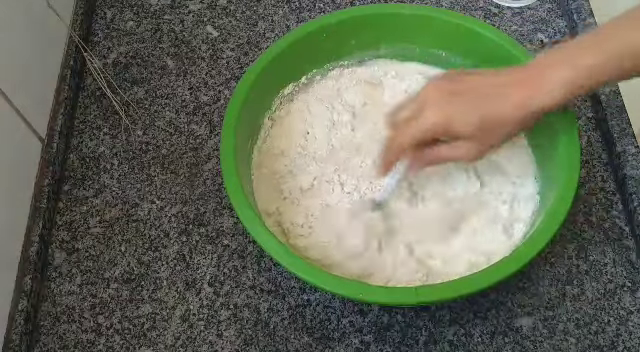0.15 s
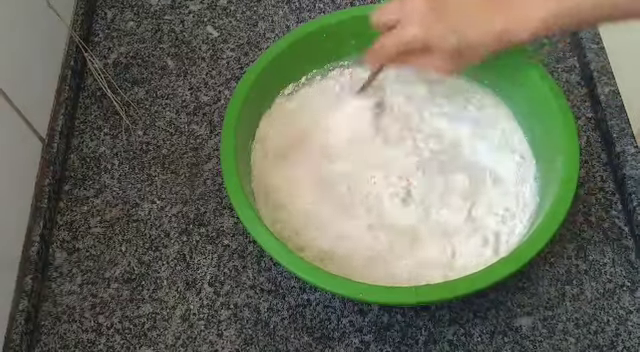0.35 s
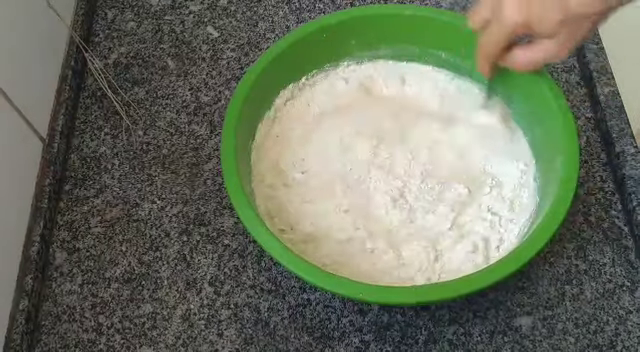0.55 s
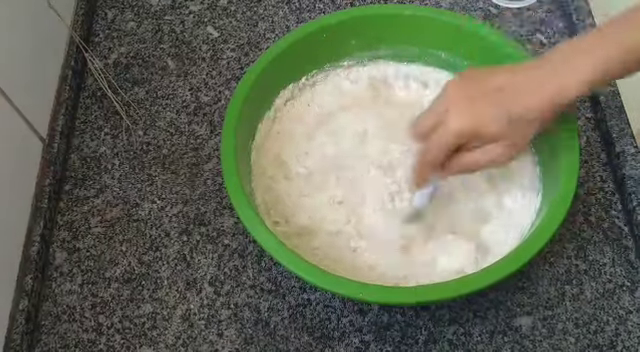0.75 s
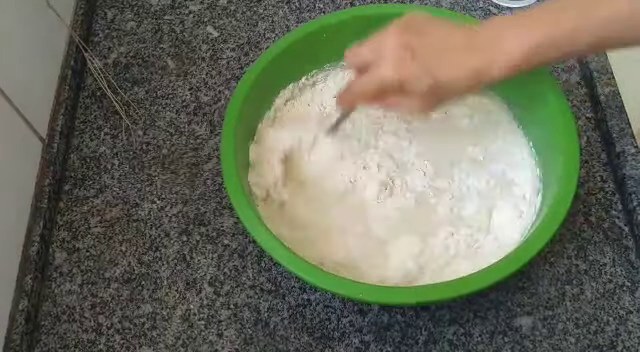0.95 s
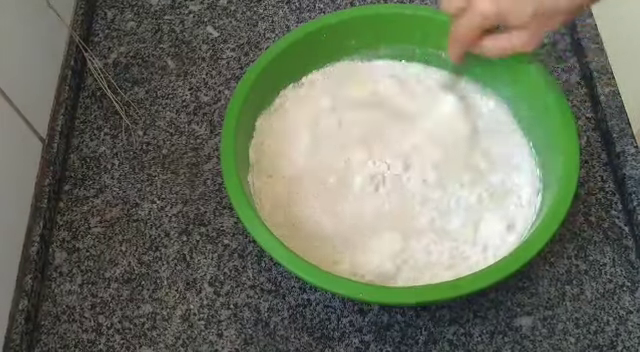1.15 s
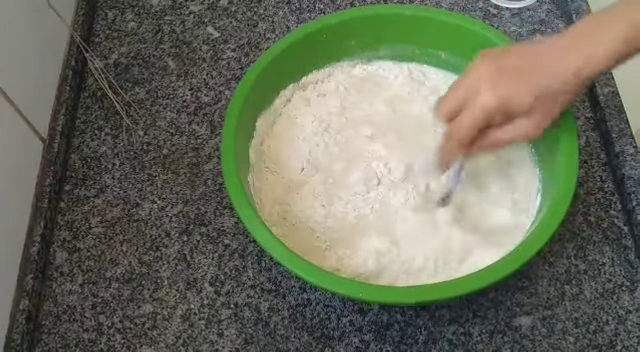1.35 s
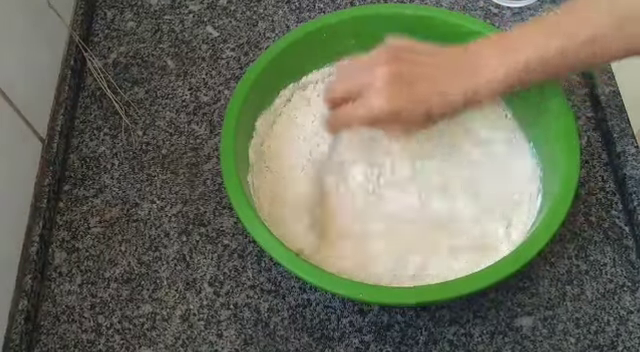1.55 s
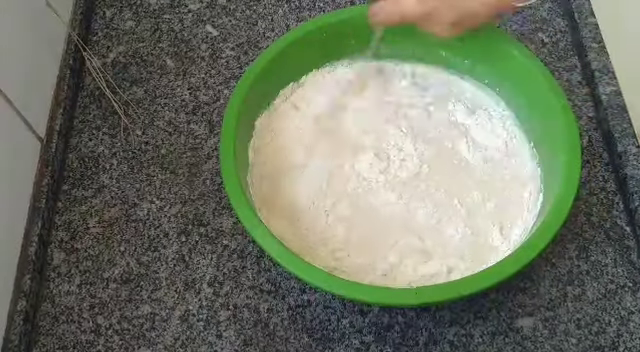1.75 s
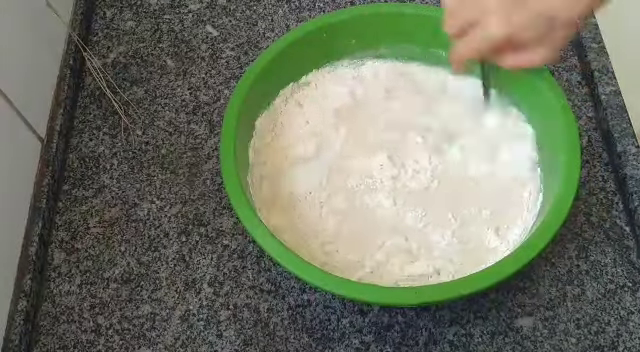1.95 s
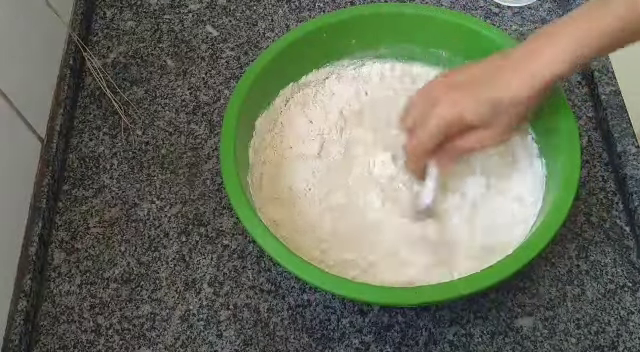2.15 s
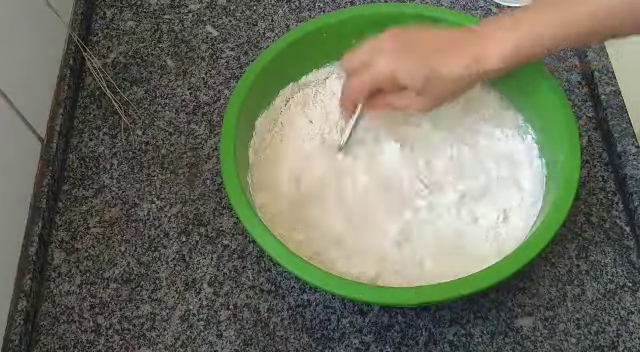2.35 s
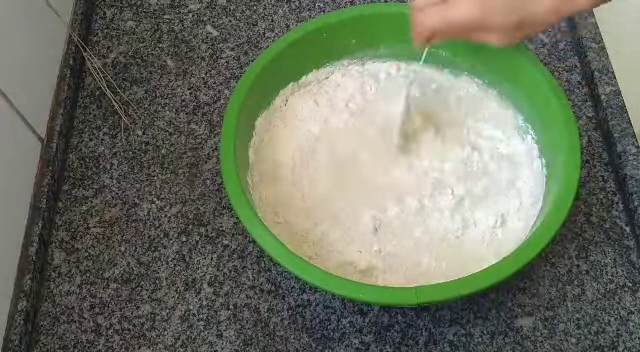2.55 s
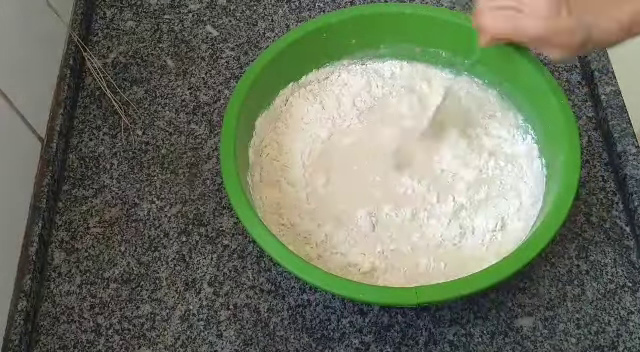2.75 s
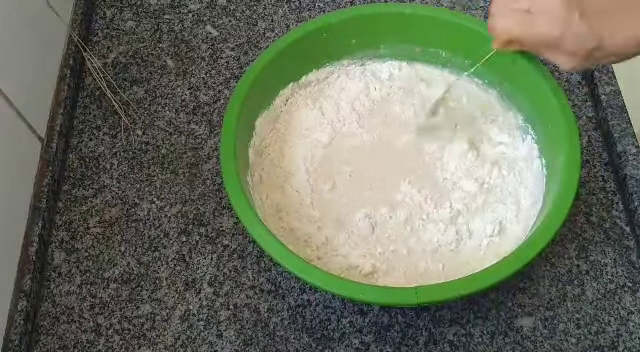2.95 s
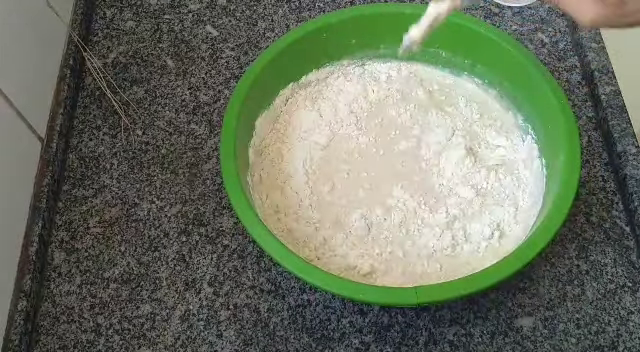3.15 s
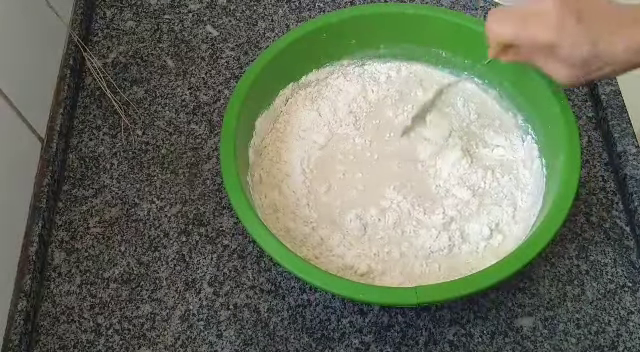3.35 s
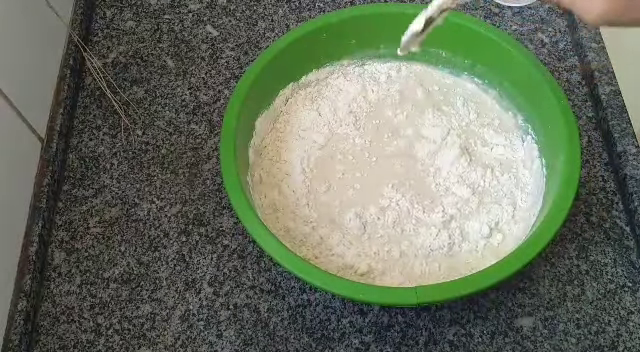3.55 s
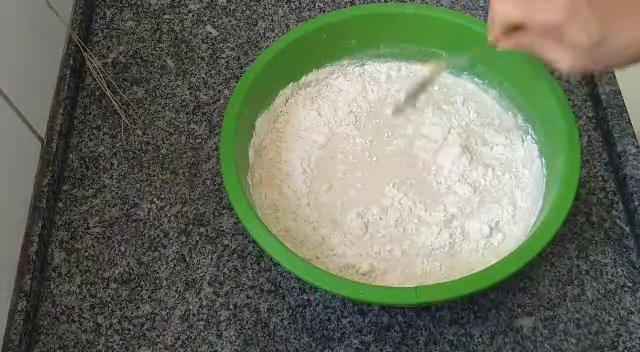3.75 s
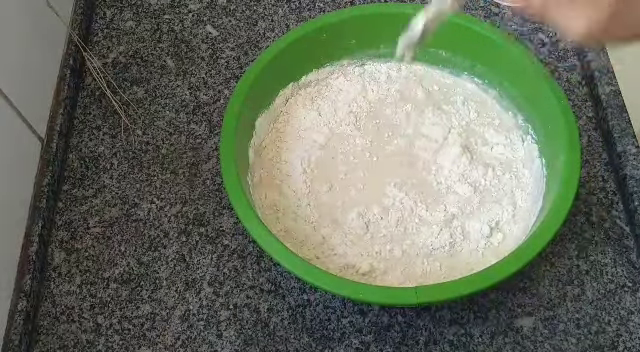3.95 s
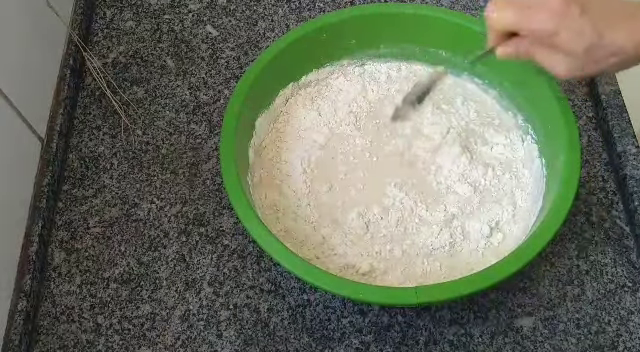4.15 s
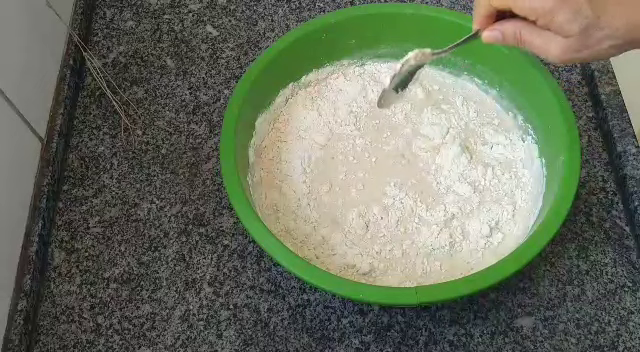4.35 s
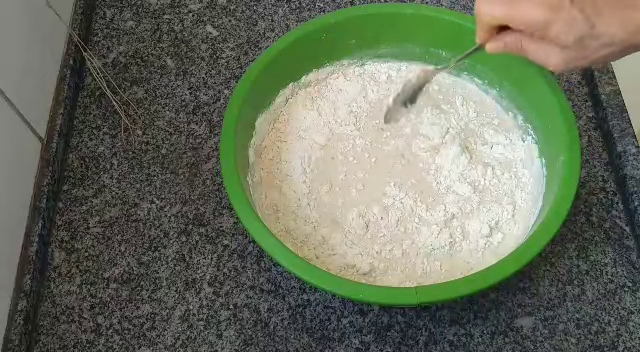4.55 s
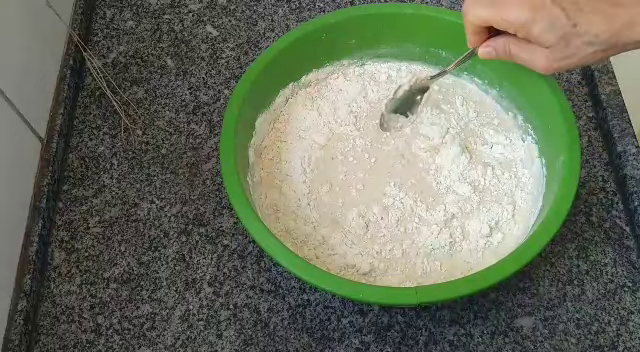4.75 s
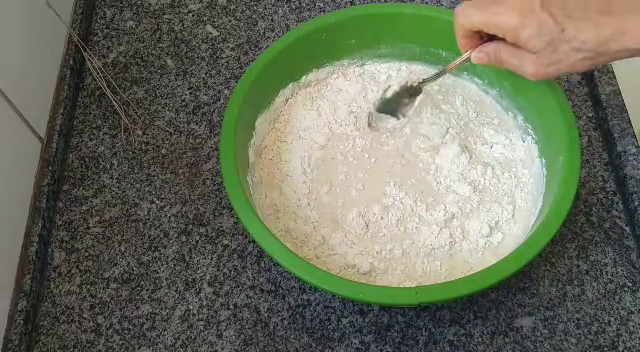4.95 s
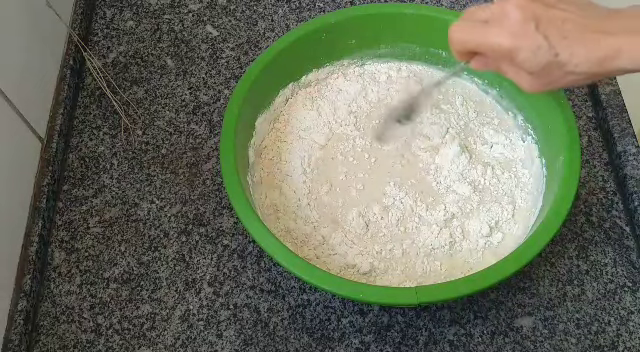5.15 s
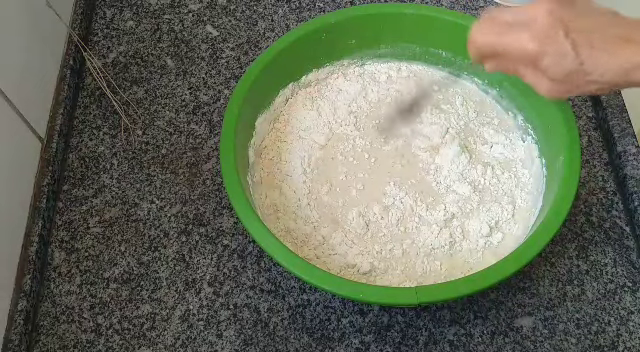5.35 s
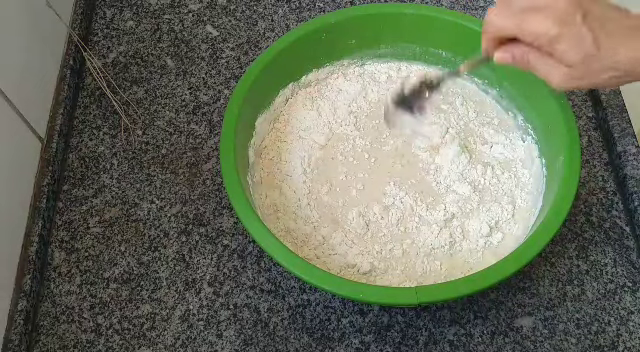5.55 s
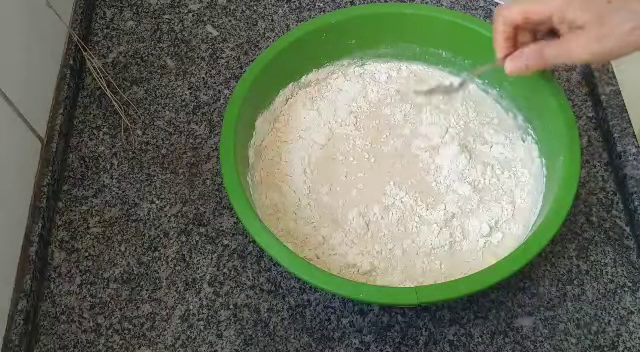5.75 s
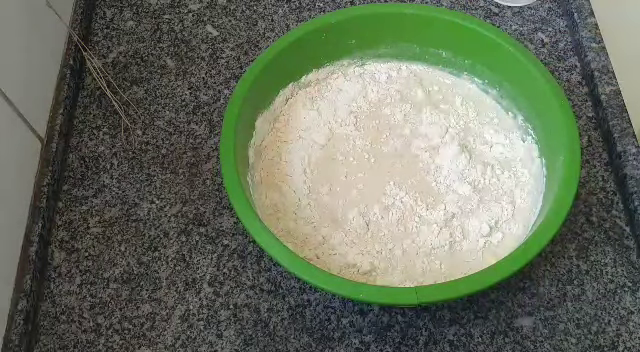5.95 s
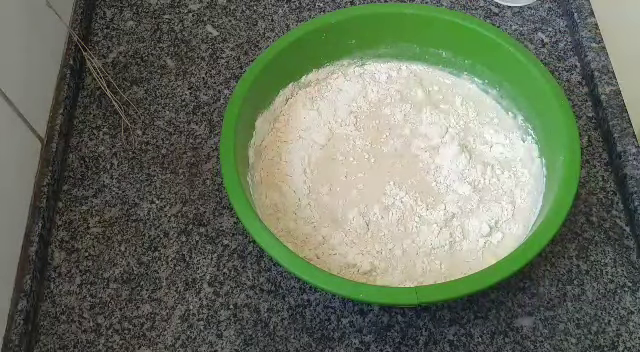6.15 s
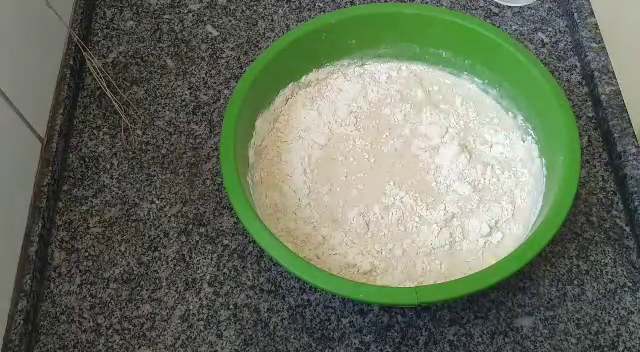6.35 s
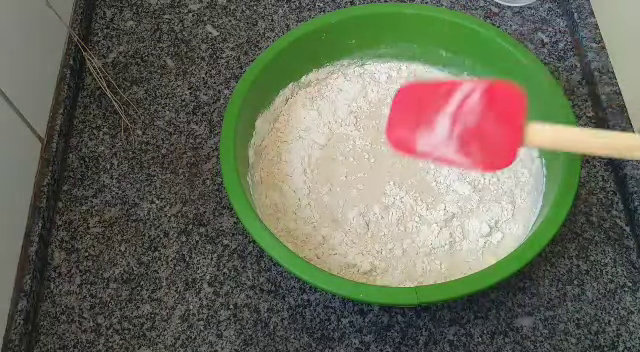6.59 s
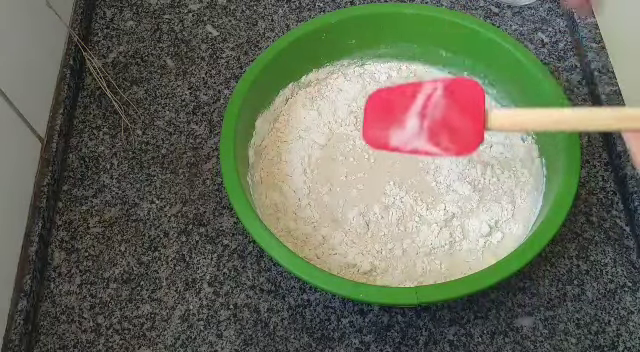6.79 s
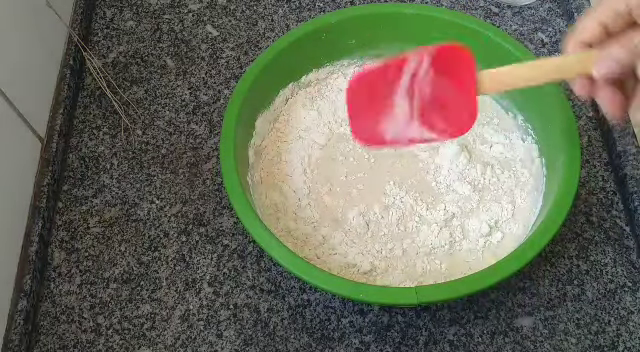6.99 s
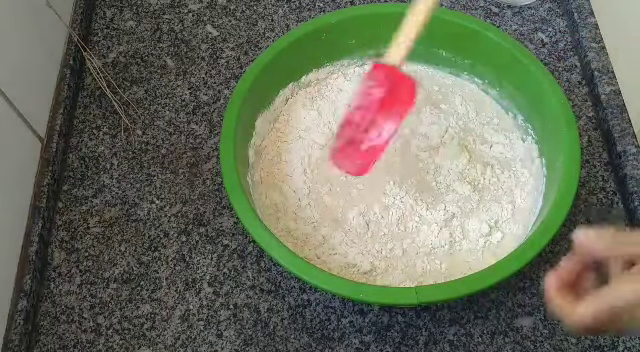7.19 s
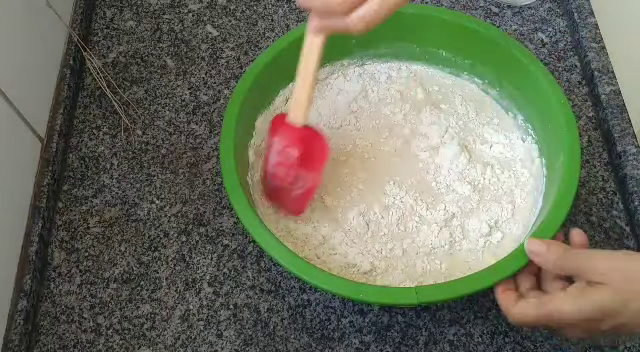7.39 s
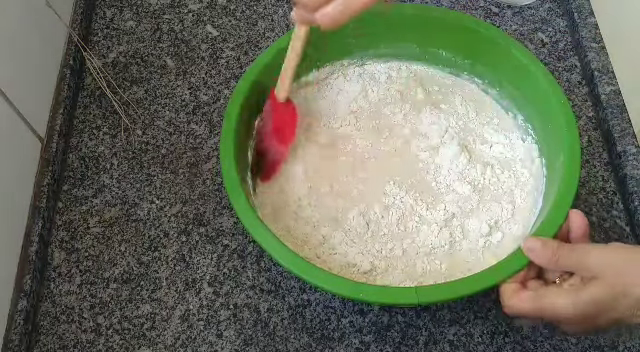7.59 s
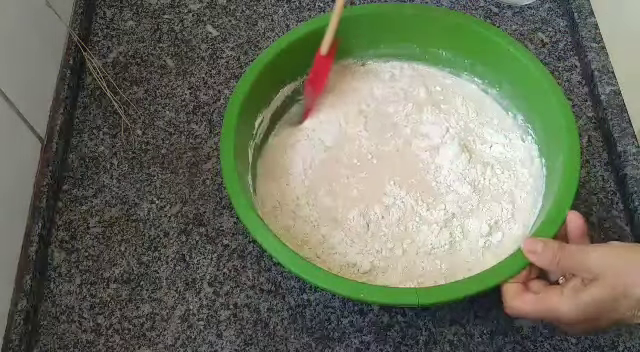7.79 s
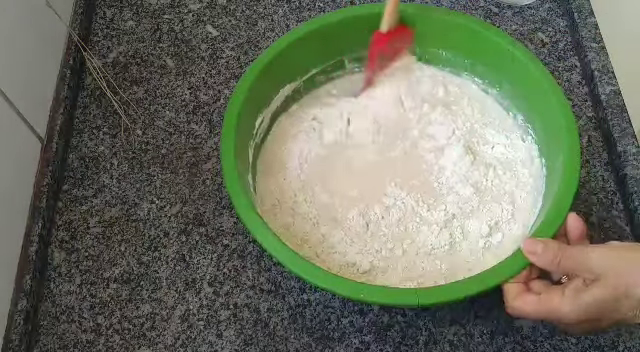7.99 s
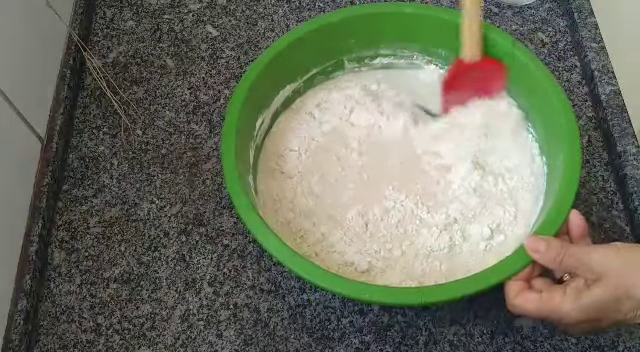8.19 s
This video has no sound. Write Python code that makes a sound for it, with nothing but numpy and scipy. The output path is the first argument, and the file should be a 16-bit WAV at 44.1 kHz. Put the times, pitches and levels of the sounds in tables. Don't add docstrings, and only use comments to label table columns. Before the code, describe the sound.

Close, wide phone sound of mixing: rapid stuttering spoon scrapes with knocks on a plastic bowl stop early, leaving soft hum, small spatters, two clear far wooden thuds and light sleeve rustle. Then a spoon lands ringing and bouncing in a steel sink. A hand settles on the bowl with a soft rumble, and a flexible spatula makes muted, dry wipes in a reflective kitchen.

```python
import sys
import numpy as np
from scipy import signal
from scipy.fft import rfft, irfft, next_fast_len
from scipy.io import wavfile
from scipy.ndimage import uniform_filter1d, minimum_filter1d, map_coordinates

SR = 44100
rng = np.random.default_rng(int(sys.argv[2]) if len(sys.argv) > 2 else 0)


def volts_from_db(level):
    exponent = np.asarray(level, float) / 20
    return 10 ** exponent


def waveform_to_disk(signal):
    frames = np.transpose(np.atleast_2d(signal))
    scaled = np.clip(frames, -1, 1) * 32767
    samples = np.round(scaled).astype(np.int16)
    wavfile.write(sys.argv[1], SR, samples)


N = 362885

# (time [s], length [s], pressure [dB], depth in bowl [dB], dryness [dB])
SPOON_STROKES = [(-0.02, .21, -35, -9.5, -8.5), (.397, 0.092, -40, -10, 4.5), (.545, 0.085, -48, 3.5, -22),
                 (.598, 0.26, -35.5, -12, -1), (1.043, 0.11, -39.5, -8, 9.5), (1.17, 0.13, -53, 4, 11),
                 (1.252, 0.2, -34.5, -11.5, -11.5), (1.641, 0.085, -43, -4, 2.5),
                 (1.77, 0.34, -55.5, 1, -11), (1.874, 0.048, -37.5, -3, 6), (1.948, 0.064, -42, -6, -8),
                 (2.055, 0.088, -34, -18, -4)]
# (time [s], length [s], pressure [dB], depth in bowl [dB], dryness [dB])
SPATULA_WIPES = [
    (7.558, 0.067, -61, -4.5, 12.5),
    (7.625, 0.14, -56, -25, 6),
    (7.769, 0.12, -49, -19, 1.5),
    (7.874, 0.12, -43.5, -5, -3.5),
    (7.974, 0.13, -47, -3, -2.5),
    (8.1, 0.043, -41.5, -3.5, -8),
    (8.17, 0.12, -51.5, -7, 0),
]
# (time [s], peak [dB])
CATCHES = [(0.053, -30), (0.116, -25), (0.142, -24), (0.454, -25.5), (0.469, -31.5), (0.554, -36),
           (0.569, -34), (0.623, -26), (0.639, -20), (0.682, -22), (0.716, -37), (0.731, -23.5),
           (0.751, -23.5), (0.794, -22.5), (0.808, -24), (0.825, -25), (0.849, -33), (1.085, -32),
           (1.098, -26.5), (1.141, -26.5), (1.183, -38), (1.266, -30), (1.295, -24), (1.338, -23),
           (1.364, -26), (1.392, -21), (1.444, -30), (1.652, -30), (1.69, -36), (1.883, -28), (1.908, -21),
           (1.959, -30), (2.057, -26), (2.074, -32), (2.109, -29), (2.138, -31), (7.59, -48), (7.606, -46),
           (7.649, -46), (7.699, -43), (7.815, -42), (7.835, -35), (7.893, -33), (7.913, -32), (7.921, -27),
           (7.955, -32), (8.022, -40), (8.053, -38), (8.104, -40), (8.119, -33), (8.132, -36),
           (8.217, -35.5)]
# (time [s], peak [dB], low push [dB], click [dB])
BUMPS = [(0.053, -40, -23, -22), (0.407, -24, -16, -14), (0.568, -27, 0, -28), (0.622, -9.5, -29, -29),
         (0.687, -11, -33, -37), (0.752, -43, -37, -26), (1.054, -31.5, -19, 4), (1.084, -19, -21, -17),
         (1.138, -18.5, -35, -17.5), (1.267, -24, -21, -19), (1.294, -16, -13, -25),
         (1.654, -23.5, -29, -10.5), (1.41, -34.5, 5.5, -17), (1.877, -21.5, 0.5, -9),
         (1.909, -18, -33, -24), (1.957, -15, -2.5, -13), (2.058, -13, -29, -18.5), (2.528, -34, -2, -9),
         (3.743, -34.5, -8, -8.5), (7.507, -36, -4.5, -12), (7.833, -23.5, -17, -9),
         (7.913, -20.5, -27, -13), (7.946, -24, -7, -3), (8.118, -33, -5, -10)]
# (frequency [Hz], width [Hz], level [dB])
BOTTOM_MODES = [(298, 86, -8.5), (439.3, 41, 0.5), (521, 49, -0.5), (668, 53, 2)]
# (frequency [Hz], width [Hz], level [dB])
WALL_MODES = [(785, 55, -5), (947, 74, -1), (1084, 53.4, 1.5), (1170, 263, -8.5), (1503, 181, -4.5),
              (2740, 220, -21)]
# (frequency [Hz], level [dB per Hz])
GRIT_SPECTRUM = [(900, -18), (2100, 6.5), (2700, 4.5), (3200, -0.5), (5000, -10), (8000, -21), (11000, -61),
                 (14000, -58)]
# (frequency [Hz], level [dB per Hz])
FLOUR_SPECTRUM = [(2500, -4), (6000, -1.5), (9000, -4), (12000, -7), (13600, -9.5), (14500, -42)]
# (frequency [Hz], gain [dB])
WET_DAMPING = [(6000, 1.5), (9000, 0), (11000, -3.5), (13500, -26.5)]
# (time [s], length [s], level [dB], crispness [dB])
RUSTLES = [
    (4.233, 0.15, -56, -20),
    (4.532, .14, -67.5, 4.5),
    (4.8, 0.81, -61, 0),
    (5.171, 0.29, -56, -3),
    (5.582, 0.26, -64, -5),
    (5.668, 0.32, -64, -4),
    (6.452, 0.26, -81, 17.5),
]
# (frequency [Hz], level [dB per Hz])
CLOTH_SPECTRUM = [(120, -12), (300, 1), (550, 1.5), (1000, -10), (2200, -13), (3500, -26)]
# (time [s], peak [dB], t60 [s])
SPLATS = [
    (2.8614, -52, 0.03),
    (2.8988, -37.5, 0.022),
    (3.389, -43, 0.031),
    (3.746, -49, 0.094),
    (4.122, -49, 0.028),
]
# (frequency [Hz], level [dB per Hz])
SPLAT_SPECTRUM = [(1500, -21), (4000, -2.5), (8000, 1), (12000, -1), (14000, -5), (14800, -40)]
# (time [s], peak [dB], sink [dB], handle modes [dB],
# crack [dB])
SINK_HITS = [
    (6.6886, -38, -4, -17, 9.5),
    (6.7208, -43, 6, -12, 9),
             (6.8037, -15.5, -7.5, -2.5, -3),
    (6.8248, -33.5, 2.5, 9, -16),
    (6.8453, -42.5, 18.5, 0, -6),
    (6.8717, -48, 3, 8, -8),
    (6.9103, -43, -19, -21, -13),
    (6.9354, -32, -3, -11, -12.5),
    (7.0394, -35, -0.5, -12, -8),
    (7.1048, -40.5, 0.5, -6.5, -5),
    (7.1598, -43.5, 2, -9, -10),
    (7.219, -51, 7.5, -2, -17),
]
# (frequency [Hz], level [dB], t60 [s], right lag [rad])
HANDLE_MODES = [(2557, -14, .15, .5), (3418, -23, .1, .5), (3811, -26, .1, 2.), (4242, -28, .1, 2.),
                (4521, -5, .3, 2.), (4503, -10, .55, 2.), (5093, -24, .2, 2.)]
# (frequency [Hz], level [dB], t60 [s], right lag [rad])
BLADE_MODES = [(5755, -26, .08, 3.1), (6896, -24, .2, 1.5), (8053, -11, .2, 2.), (8120, -12, .3, 2.16),
               (8530, -19, .07, 1.6), (9302, -25, .1, .4), (9615, -27, .15, .4), (10950, -21, .11, .4),
               (11075, -14, .19, 2.8), (11200, -15, .28, 2.), (12355, -17, .3, 1.6), (12670, -10, .16, 2.),
               (13180, -12, .2, 2.), (13340, -21, .25, 1.)]
# (frequency [Hz], level [dB], t60 [s], right lag [rad])
SCOOP_MODES = [(4823, -18, .1, 2.), (5110, -21, .2, 2.), (5520, -19, .25, 2.), (5970, -23, .3, 1.),
               (6500, -26, .2, 1.), (7278, -24, .26, 2.), (7900, -20, .2, 2.), (8400, -19, .25, 2.),
               (10150, -22, .3, 2.), (11630, -17, .25, 1.), (11880, -17, .25, 2.), (12480, -16, .2, 1.),
               (12900, -18, .2, 2.), (13100, -21, .25, 1.)]
# (frequency [Hz], level [dB], t60 [s], right lag [rad])
SINK_MODES = [(214, 0, .55, .1), (255, -9, .4, .2), (290, -13, .5, .3), (386, -8, .7, .4),
              (511, -4, .37, .5), (790, -10, .35, 1.), (834, -8, .4, 1.1), (972, 0, .5, 1.2),
              (1093, -8, .4, 1.), (1191, -12, .35, 1.), (1540, -12, .25, 1.), (1939, 3, .3, 2.3),
              (2686, -5, .18, .5), (2918, -13, .2, .5)]
# (frequency [Hz], level [dB per Hz])
SINK_SPECTRUM = [(230, -10), (450, -4.5), (1000, 0.5), (2700, -5.5), (3600, -16), (8000, -23), (9300, -32),
                 (13500, -27), (14500, -45)]
# (frequency [Hz], t60 [s])
SINK_T60 = [(200, 0.59), (1000, 0.2), (3000, 0.26), (10000, 0.56)]
# (time [s], length [s], rumble [dB])
GRIPS = [
    (7.469, 0.32, -63),
    (7.8, 0.23, -76),
    (7.95, .5, -76),
]
# (time [s], peak [dB], boom [dB])
THUDS = [
    (3.080, -31.5, -1),
    (3.409, -50.5, 12),
    (4.123, -21.5, -0.5),
]
# (frequency [Hz], t60 [s])
THUD_T60 = [(60, 0.57), (200, 0.71), (500, 0.57), (1100, 0.56), (3000, 0.051)]
# (frequency [Hz], level [dB per Hz])
BOOM_SPECTRUM = [(30, -7), (50, 7), (80, 6), (140, 11), (250, -5), (400, -31)]
# (frequency [Hz], level [dB per Hz])
KNOCK_SPECTRUM = [(250, -20.5), (400, -15.5), (700, -19.5), (1000, -14.5), (1400, -30), (2000, -35.5),
                  (4000, -50), (13000, -75)]
# (time [s], level [dB])
ROOM_TONE = [(0, -59), (2.4, -60), (4.1, -62), (4.4, -59), (5.4, -62), (5.9, -66.5), (6.6, -66),
             (6.9, -70.5), (7.2, -64), (7.7, -59.5), (8.23, -58.5)]
# (frequency [Hz], level [dB per Hz])
AIR_SPECTRUM = [(25, -15.5), (60, 3), (140, 0), (1000, -18.5), (4000, -26), (10000, -36.5), (12000, -35.5),
                (13500, -57)]
# (frequency [Hz], t60 [s])
KITCHEN_T60 = [(200, 0.55), (1000, 0.6), (4000, 0.52), (12000, 0.067)]
# (frequency [Hz], likeness [0-1])
ALIKE_NEAR = [(60, 1), (400, 0.79), (1000, 0.68), (1600, 0.15), (2500, 0.092)]
# (frequency [Hz], likeness [0-1])
ALIKE_AIR = [(25, 0.21), (100, 0.16), (1000, 0.1), (3000, 0.)]
# (frequency [Hz], share [0-1])
CROSS_FEED = [(100, 0.57), (2050, 0.56), (4100, 0.46), (6500, 0.29), (10000, 0.029), (14000, .05)]

BITE_S, ARCH_DB = 0.018, 5
CLIMB_DB = 0.5
LIFT_DB_PER_S, LOW_LINGERS, HISS_STOPS = 331, 0.34, 4.1
GRIT_DB, GRIT_DRY, GRIT_GROWS_DB = -15.5, 0.44, 3.5
WET_FLOUR_DB, DRY_FLOUR_DB = -28.5, -12.5
RUSTLE_GRIT_DB, RUSTLE_FLOUR_DB = -12, -11
CATCH_HZ, CATCH_SPREAD, CATCH_T60_S = 997, 0.1, 0.022
CATCH_DB, CATCH_RINGS_DB = -3, -2.5
HUM_HZ = 97.6
CROSS_DELAY_SAMPLES = 21
MASKED_DB = 15.5
HOP = 64


def unit(x):
    return x / np.sqrt(np.mean(x ** 2) + 1e-20)


def along(points, hz):
    f, v = np.transpose(points)
    return np.interp(np.log(hz + 1), np.log(f + 1), v)


def curves(rows):
    s, *cols = np.transpose(rows)
    return [np.interp(np.arange(N) / SR, s, c, left=-140, right=-140) for c in cols]


def wobble(rate_hz):
    knots = rng.standard_normal(int(N * rate_hz / SR) + 4)
    return map_coordinates(knots, [np.arange(N) * rate_hz / SR], order=2)


def filtered(x, response):
    m = next_fast_len(x.shape[-1] + 8192)
    return irfft(rfft(x, m) * response(np.fft.rfftfreq(m, 1 / SR)), m)[..., :x.shape[-1]]


def resonant(x, modes):
    def response(f):
        total = 0
        for k, (hz, width, db) in enumerate(modes):
            damping = 1j * f * width
            total = total + (-1) ** k * volts_from_db(db) * damping / (hz * hz - f * f + damping)
        return total
    return filtered(x, response)


def hiss(size, alike, spectrum=((1, 0),)):
    def response(hz):
        turn = np.arccos(np.clip(along(alike, hz), -1, 1)) / 2
        return volts_from_db(along(spectrum, hz)) * [np.cos(turn), np.sin(turn)]
    mid, side = filtered(rng.standard_normal((2, size)), response)
    return unit(np.array([mid + side, mid - side]))


def dying(x, t60s):
    hz, t, z = signal.stft(x, SR, nperseg=256)
    z = z * volts_from_db(-60 * t / along(t60s, hz)[:, None])
    return signal.istft(z, SR, nperseg=256)[1][:, :x.shape[1]]


def patchy(x, patchy_db):
    z = signal.stft(x, nperseg=256)[2]
    field = uniform_filter1d(rng.standard_normal(z.shape[1:]), size=4, axis=0)
    field = uniform_filter1d(field, size=10, axis=1)
    return unit(signal.istft(z * volts_from_db(patchy_db * unit(field)), nperseg=256)[1][:, :N])


def stroked(rows, fall, grows_db=0):
    s, length = np.transpose(rows)[:2, :, None]
    since = np.arange(0, N + HOP, HOP) / SR - s
    done = np.clip(since / length, 0, 1)
    arch_db = ARCH_DB * (np.sin(np.pi * done) - 1)
    bite_db = 20 * np.log10(np.clip(since / BITE_S, 1e-3, 1))
    hold_db = arch_db + grows_db * (done - 0.5) + bite_db
    lift_db = fall * LIFT_DB_PER_S * np.maximum(since - length, 0)
    return np.where(since < 0, -140, hold_db - lift_db)


def swells(rows):
    s, length = np.transpose(rows)[:2, :, None]
    done = np.clip((np.arange(0, N + HOP, HOP) / SR - s) / length, 0, 1)
    return np.sin(np.pi * done) ** 2


def summed(gains):
    total = np.sqrt(np.sum(gains ** 2, axis=0))
    return np.interp(np.arange(N) / HOP, np.arange(gains.shape[1]), total)


def add(out, s, x):
    part = out[:, round(s * SR):round(s * SR) + x.shape[1]]
    part += x[:, :part.shape[1]]


def scraping():
    rows = SPOON_STROKES + SPATULA_WIPES
    press_db, depth_db, dry_db = np.transpose(rows)[2:, :, None]
    load_db = np.array([WET_FLOUR_DB] * len(SPOON_STROKES) + [DRY_FLOUR_DB] * len(SPATULA_WIPES))[:, None]
    jolts_db = 1.0 * wobble(160) + 1.27 * wobble(40)

    wall = patchy(resonant(volts_from_db(jolts_db) * hiss(N, ALIKE_NEAR), WALL_MODES), patchy_db=1.5)
    bottom = unit(resonant(volts_from_db(1.2 * jolts_db) * hiss(N, ALIKE_NEAR), BOTTOM_MODES))
    wall_gain = summed(volts_from_db(press_db - 4 + stroked(rows, 1, CLIMB_DB)))
    bottom_gain = summed(volts_from_db(press_db + depth_db + stroked(rows, LOW_LINGERS, -CLIMB_DB)))
    bowl = wall_gain * wall + bottom_gain * bottom

    grit_db = 0.39 * jolts_db + 0.65 * wobble(300)
    grit = patchy(volts_from_db(grit_db) * hiss(N, ALIKE_NEAR, GRIT_SPECTRUM), patchy_db=3.0)
    flour_db = 1.8 * wobble(250) + 0.28 * jolts_db + 0.9 * wobble(22)
    flour = patchy(volts_from_db(flour_db) * hiss(N, ALIKE_NEAR, FLOUR_SPECTRUM), patchy_db=4.5)
    wet_flour = unit(filtered(flour, lambda hz: volts_from_db(along(WET_DAMPING, hz))))
    flour = np.where(np.arange(N) < 2.5 * SR, wet_flour, flour)
    hissing_db = press_db + stroked(rows, HISS_STOPS, GRIT_GROWS_DB)
    grit_gain = summed(volts_from_db(hissing_db + GRIT_DB + 4.0 + GRIT_DRY * dry_db))
    tool = grit_gain * grit + summed(volts_from_db(hissing_db + load_db + dry_db)) * flour

    cloth_db, crisp_db = np.transpose(RUSTLES)[2:, :, None]
    cloth = unit(volts_from_db(6.9 * wobble(30)) * hiss(N, ALIKE_AIR, CLOTH_SPECTRUM))
    rustle = summed(volts_from_db(cloth_db) * swells(RUSTLES)) * cloth
    crisp_gain = summed(volts_from_db(cloth_db + crisp_db) * swells(RUSTLES))
    crisp = crisp_gain * (volts_from_db(RUSTLE_GRIT_DB) * grit + volts_from_db(RUSTLE_FLOUR_DB) * flour)
    return bowl + tool + rustle + crisp


def catches():
    jerks, t = np.zeros((2, N)), np.arange(SR // 40) / SR
    draws = rng.standard_normal((len(CATCHES), 3))
    for (s, db), (spot, over, side) in zip(CATCHES, draws):
        phase = 2 * np.pi * CATCH_HZ * np.exp(CATCH_SPREAD * spot) * t
        envelope = volts_from_db(-60 * t / CATCH_T60_S) * (1 - np.exp(-t / 0.00078))
        swing = envelope * (np.sin(phase) + 0.38 * over * np.sin(1.485 * phase))
        add(jerks, s + 0.000984, volts_from_db(db + CATCH_DB + side * np.array([[0.7], [-0.7]])) * swing)
    return jerks + volts_from_db(CATCH_RINGS_DB) * resonant(jerks, WALL_MODES + BOTTOM_MODES)


def bumps():
    blows, out, t = np.zeros((2, N)), np.zeros((2, N)), np.arange(SR // 10) / SR
    push_spectrum = [(60, 2.0), (150, -5.5), (400, 7.0), (900, -31)]
    for s, db, low_db, click_db in BUMPS:
        add(blows, s, volts_from_db(db + 2.5 - 60 * t / 0.017) * hiss(len(t), ALIKE_NEAR))
        add(out, s, volts_from_db(db + low_db - 17.5 - 60 * t / 0.11) * hiss(len(t), ALIKE_NEAR, push_spectrum))
        add(out, s, volts_from_db(db + click_db - 18 - 60 * t / 0.093) * hiss(len(t), ALIKE_NEAR, GRIT_SPECTRUM))
    return out + resonant(blows, WALL_MODES)


def splats():
    out, t = np.zeros((2, N)), np.arange(SR // 8) / SR
    for s, db, t60 in SPLATS:
        envelope = volts_from_db(db - 7.0 - 60 * t / max(t60, 0.005)) * (1 - np.exp(-t / 0.0027))
        add(out, s, envelope * hiss(len(t), ALIKE_NEAR, SPLAT_SPECTRUM))
    return out


def ringing(modes, t, count, scatter_db, rattle_db):
    hz, db, t60, lag = np.transpose(modes)[:, :, None]
    slow = t[::21]
    draws = rng.standard_normal((count, len(hz), 61))
    flutter = signal.resample(draws[..., 1:], len(slow), axis=2)
    level = volts_from_db(db + scatter_db * draws[..., :1] + rattle_db * flutter - 60 * slow / t60)
    waves = np.sin(2 * np.pi * hz * t - np.array([0 * lag, lag]))
    return [np.einsum("mt,cmt->ct", np.repeat(hit, 21, axis=1), waves) for hit in level]


def spoon_in_sink():
    out, t, hits = np.zeros((2, N)), np.arange(SR * 11 // 20) / SR, SINK_HITS
    handles = ringing(HANDLE_MODES, t, len(hits), scatter_db=1.5, rattle_db=4.5)
    blades = ringing(BLADE_MODES, t, len(hits), scatter_db=1.5, rattle_db=5.5)
    scoops = ringing(SCOOP_MODES, t, len(hits), scatter_db=1.5, rattle_db=7.0)
    basins = ringing(SINK_MODES, t, len(hits), scatter_db=1.5, rattle_db=5.0)
    crack_spectrum = [(500, -20.0), (2600, -2.0), (6000, -17), (13000, -15.0), (15500, -30)]
    crack_snap = 1 + 1.03 * np.exp(-t / 0.00088)
    spoon_rise, sheet_rise = 1 - np.exp(-t / 0.00025), 1 - np.exp(-t / 0.0052)
    for hit, handle, blade, scoop, basin in zip(hits, handles, blades, scoops, basins):
        s, db, sink_db, handle_db, crack_db = hit
        spoon = volts_from_db(handle_db) * handle + volts_from_db(-2.5) * blade + volts_from_db(-10.0) * scoop
        crack = volts_from_db(crack_db - 60 * t / 0.059) * crack_snap * hiss(len(t), ALIKE_NEAR, crack_spectrum)
        sheet = volts_from_db(-16.5) * basin + volts_from_db(-6.5) * dying(hiss(len(t), ALIKE_NEAR, SINK_SPECTRUM), SINK_T60)
        add(out, s, volts_from_db(db - 7.5) * (spoon_rise * spoon + crack + volts_from_db(sink_db + 5) * sheet_rise * sheet))
    return out


def grip():
    rumble_db = np.transpose(GRIPS)[2][:, None]
    level = summed(volts_from_db(rumble_db + 4.0) * swells(GRIPS))
    out, start = np.zeros((2, N)), round(GRIPS[0][0] * SR)
    out[:, start:] = hiss(N - start, ALIKE_NEAR, [(15, -16), (45, -7), (80, 0), (150, -31.5)])
    return level * out


def kitchen(x):
    turn = 2.41 * wobble(3)
    late = np.pad(x, ((0, 0), (300, 0)))[:, :N]
    tails = [dying(hiss(SR * 2 // 3, ALIKE_NEAR), KITCHEN_T60) for _ in range(2)]
    out = np.zeros((2, N))
    for share, tail in zip((np.cos(turn), np.sin(turn)), tails):
        out += signal.fftconvolve(share * late, tail / np.linalg.norm(tail[0]), axes=1)[:, :N]
    return out


def thuds():
    out, t = np.zeros((2, N)), np.arange(SR * 2 // 3) / SR
    direct = 1 + 1.7 * np.exp(-t / 0.018)
    boom_rise = 1 - np.exp(-t / 0.0087)
    for s, db, boom_db in THUDS:
        knock = hiss(len(t), ALIKE_NEAR, KNOCK_SPECTRUM)
        boom = volts_from_db(boom_db + 7) * boom_rise * hiss(len(t), ALIKE_NEAR, BOOM_SPECTRUM)
        add(out, s, volts_from_db(db - 19.5) * direct * dying(knock + boom, THUD_T60))
    return out


def room_tone():
    level_db, = curves(ROOM_TONE)
    turns = np.cumsum(HUM_HZ + 0.85 * wobble(5)) / SR
    hum_db = level_db + 7.5 + 2.5 * wobble(25) + 1.4 * wobble(4)
    hum = volts_from_db(hum_db) * np.sin(2 * np.pi * turns + np.array([[0], [0.15]]))
    air_db = level_db + 5.5 + 0.16 * wobble(24.0)
    return hum + volts_from_db(air_db) * hiss(N, ALIKE_AIR, AIR_SPECTRUM + [(15000, -72)])


def scene():
    work = scraping() + bumps() + catches() + splats()
    sink = spoon_in_sink() * volts_from_db([[0.3], [-0.3]])
    room = kitchen(volts_from_db(-10.0) * work + volts_from_db(-9.0) * sink)
    return work + sink + room + thuds() + grip() + room_tone() * volts_from_db([[-0.4], [0.4]])


def band_gate(x, edge_db, follow):
    hz, t, z = signal.stft(x, SR, nperseg=2048)
    power = np.mean(np.abs(z[:, :1024]) ** 2, axis=0)
    loud_db = 10 * np.log10(uniform_filter1d(power.sum(axis=0), size=15, origin=6) + 1e-12)
    band_db = 10 * np.log10(power.reshape(64, 16, -1).mean(axis=1) + 1e-20)
    band = np.arange(64)[:, None]
    top_db = 1.6 * np.maximum(band - 24, 0) + 6.5 * np.maximum(band - 38, 0)
    need_db = edge_db + follow * (loud_db + 60.5) + top_db
    masker_db = -minimum_filter1d(np.where(band > 10, -band_db, 200), size=7, axis=0)
    scatter_db = 3.8 * unit(uniform_filter1d(rng.standard_normal(band_db.shape), size=4, axis=1))
    strong = band_db + scatter_db > np.maximum(need_db, masker_db - MASKED_DB)
    kept = np.repeat(strong, 16, axis=0) | (hz[:1024, None] < 3750)
    return signal.istft(z * np.vstack([kept, kept[-1:]]), SR, nperseg=2048)[1][:, :N]


def low_pass(x):
    return signal.sosfilt(signal.butter(12, 14600, fs=SR, output="sos"), x)


def record(dry):
    def feed(hz):
        return along(CROSS_FEED, hz) * np.exp(-2j * np.pi * hz * CROSS_DELAY_SAMPLES / SR)
    widened = dry - filtered(dry[::-1], feed)
    return low_pass(band_gate(widened, edge_db=-130, follow=0.95))


dry = scene()
out = record(dry)
waveform_to_disk(out)
```